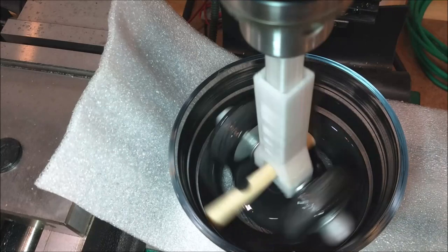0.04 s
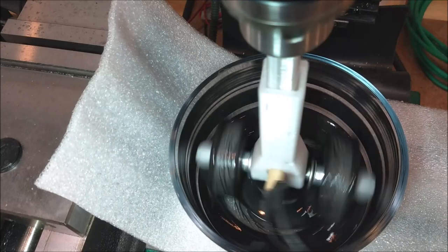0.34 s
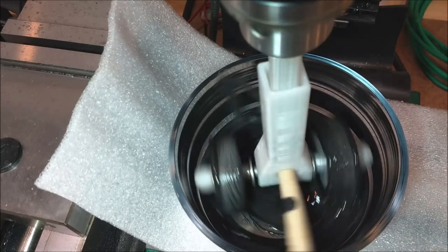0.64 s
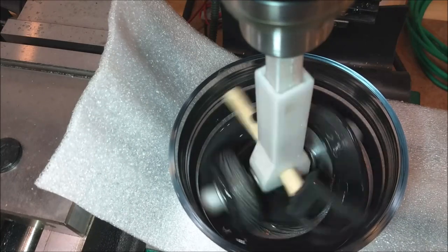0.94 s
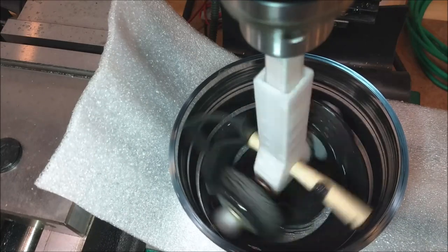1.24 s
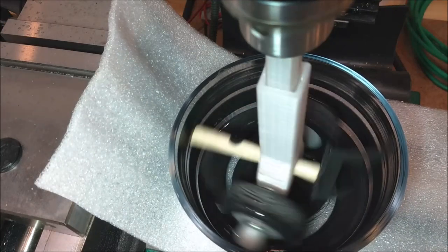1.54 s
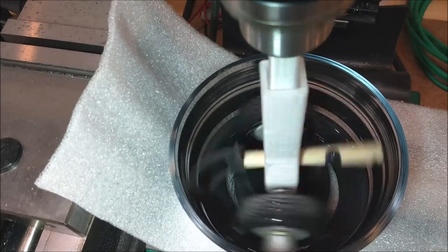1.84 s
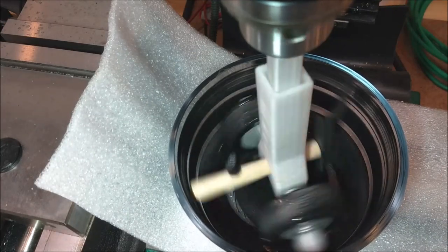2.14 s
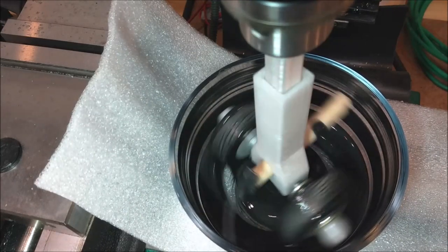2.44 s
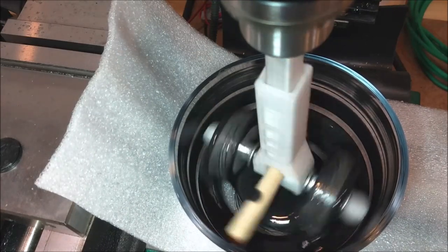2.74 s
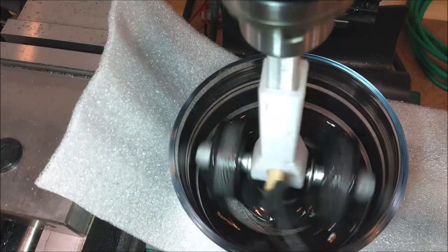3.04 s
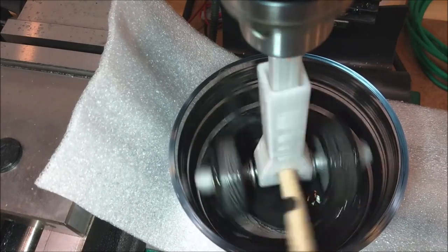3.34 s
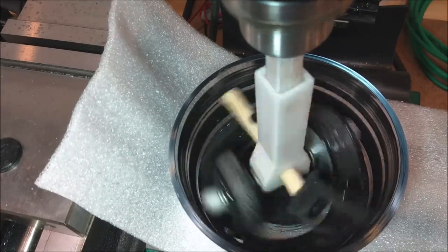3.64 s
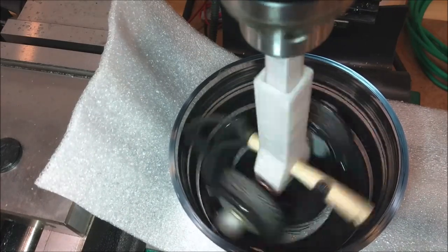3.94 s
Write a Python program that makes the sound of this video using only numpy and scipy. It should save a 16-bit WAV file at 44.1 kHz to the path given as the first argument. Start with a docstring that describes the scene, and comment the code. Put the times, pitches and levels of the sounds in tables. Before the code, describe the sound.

A mill motor hums and whirs steadily close by, turning rollers around a steel bowl. Gritty grinding swells with each turn, while dull knocks, small cracks and brief squeals come and go.

```python
"""Roller mill in a workshop

A motor hums and whirs steadily as it turns two rollers round a steel bowl; its drive throbs, moans
and knocks. The rollers grind harder at the same places on every turn, and friction excites the
bowl's resonant modes. Now and then a roller skids or squeals, or a grain cracks and rings the bowl.
Two close microphone ports hear the mill; the bowl's sound has opposite polarity in the right one."""
import sys
import numpy as np
from scipy import signal
from scipy.fft import rfft, irfft, next_fast_len
from scipy.io import wavfile
from scipy.ndimage import map_coordinates

SR = 44100
rng = np.random.default_rng(int(sys.argv[2]) if len(sys.argv) > 2 else 0)


def master_out(mix):
    """Clip the mix to full scale and print it as 16-bit PCM to the path in sys.argv[1]."""
    frames = np.transpose(np.atleast_2d(mix))
    ceiling = np.clip(frames, -1, 1)
    pcm = np.round(ceiling * 32767).astype(np.int16)
    wavfile.write(sys.argv[1], SR, pcm)


N = 176400

HUM_HZ, TURN_S = 120.02, .678
# bowl resonances (frequency [Hz], bandwidth [Hz], level [dB])
LOW_MODE, MAIN_MODE, HIGH_MODE = (2490, 92, -60.5), (3460, 72, -63), (4205, 84, -59)
# motor's phase at the left port over the right (frequency [Hz], lead [rad])
PHASE_LEAD = [(80, -3), (120, -1.8), (245, -1.8), (330, -.6), (360, -.2), (480, -.4), (660, -.2),
              (820, -.4), (1100, -.05), (1300, -.8), (1560, .3), (1750, -2.2), (2100, -3.1)]
# places of harder grinding (time in the turn [s], half width [s], rise [dB])
PRESSURE_SWELLS = [(0.26, 0.058, 6.5), (0.53, 0.016, 7), (0.15, 0.099, 3)]
# spectrum of a snapping grain (frequency [Hz], relative level [dB])
SNAP_SPECTRUM = [(1500, -12), (3000, 8), (6000, 5), (8000, -9), (10500, 7), (14500, 5), (16000, -11)]


def amp(db):
    """Decibels as an amplitude ratio."""
    return 10 ** (np.asarray(db) / 20)


def unit(x):
    """Normalisation to rms 1."""
    return x / np.sqrt(np.mean(x ** 2) + 1e-20)


def along(points, hz):
    """Interpolation of (frequency, value) points on a logarithmic axis."""
    freqs, values = np.transpose(points)
    return np.interp(np.log(hz + 1), np.log(freqs + 1), values)


def clock():
    """Sample times in seconds."""
    return np.arange(N) / SR


def bump(offset, half_width):
    """Gaussian envelope, down to 1/e at the half width."""
    return np.exp(-(offset / half_width) ** 2)


def wobble(rate):
    """Smooth random modulation: a spline through `rate` values a second."""
    return map_coordinates(rng.standard_normal(int(N * rate / SR) + 4), [clock() * rate])


def filtered(x, response):
    """Linear filtering: the spectrum times a frequency response."""
    size = next_fast_len(N + SR // 2)
    return irfft(rfft(x, size) * response(np.fft.rfftfreq(size, 1 / SR)), size)[..., :N]


def colour(x, spectrum):
    """Spectral shaping, normalised to rms 1."""
    return unit(filtered(x, lambda hz: amp(along(spectrum, hz))))


def ring(x, mode):
    """Forced resonance: two equal band-passes in cascade, scaled to the mode's level."""
    centre, width, db = mode
    band_pass = lambda hz: 1j * hz * width / (centre ** 2 - hz ** 2 + 1j * hz * width)
    return amp(db) * unit(filtered(x, lambda hz: band_pass(hz) ** 2))


def noise():
    """Two uncorrelated white noises."""
    return rng.standard_normal((2, N))


def grains(rate, spread_db):
    """Random amplitude modulation breaks noise into short bursts."""
    return unit(noise() * amp(spread_db * wobble(rate)))


def each_turn(swells):
    """Periodic gain that rises at the same places on every turn."""
    offset = lambda s: (clock() - s + TURN_S / 2) % TURN_S - TURN_S / 2
    return amp(sum(db * bump(offset(s), width) for s, width, db in swells))


def blows(events, attack, t60):
    """Impact envelope: impulses (time [s], level [dB]) convolved with a fast rise and a decay."""
    s, db = np.transpose(events)
    impulses = np.bincount(np.clip(np.round(s * SR).astype(int), 0, N - 1), amp(db), N)
    age = np.arange(SR // 4) / SR
    return signal.fftconvolve(impulses, amp(-60 * age / t60) * (1 - np.exp(-age / attack)))[:N]


def from_motor(pair):
    """Partial coherence: motor noise is partly alike at the two ports, and shifted in phase."""
    # likeness of the ports (frequency [Hz], coherence [0-1])
    coherence = [(40, .3), (80, 0.9), (170, 0.43), (300, 0.82), (370, 0.42), (550, 0.44), (700, 0.88),
                 (850, 0.84), (1100, 0.84), (1300, 0.1), (1700, 0.85), (2100, 0.91)]
    angle = lambda hz: np.arccos(np.clip(along(coherence, hz), 0, 1)) / 2
    mid, side = filtered(pair, lambda hz: np.array([np.cos(angle(hz)), np.sin(angle(hz))]))
    phase_shift = lambda hz: np.exp(.5j * np.outer([1, -1], along(PHASE_LEAD, hz)))
    return filtered(np.array([mid + side, mid - side]), phase_shift)


def from_bowl(pair):
    """Path difference: sounds from opposite sides reach the ports with opposite delays."""
    # sound from the far side (frequency [Hz], share of power [0-1])
    far_share = [(2000, .85), (7500, .25), (9500, .1), (11000, .75), (15000, .85)]
    # port balance (frequency [Hz], left minus right [dB])
    balance = [(2000, 1.5), (4000, -1.5), (8000, -1.5), (12000, -3.5)]
    port_lag_s, polarity = .000454, [[1], [-1]]
    share = lambda hz: np.clip(along(far_share, hz), 0, 1)
    lag = lambda hz: np.exp(1j * np.pi * port_lag_s * np.outer([-1, 1], hz))
    near = filtered(pair[0], lambda hz: np.sqrt(1 - share(hz)) * lag(hz))
    far = filtered(pair[1], lambda hz: np.sqrt(share(hz)) / lag(hz))
    return filtered(near + far, lambda hz: amp(np.outer([.5, -.5], along(balance, hz))) * polarity)


def tone(hz, db, pan_db, waver_db, drift_rad):
    """A sinusoid at both ports, with slight random amplitude and phase modulation."""
    phase = 2 * np.pi * (hz * clock() + rng.random()) + drift_rad * wobble(5.7)
    sides = np.array([[.5], [-.5]])
    gain = amp(db + waver_db * wobble(14)) * unit(amp(sides * pan_db))
    return gain * np.sin(phase + sides * along(PHASE_LEAD, hz))


def motor():
    """Magnetic forces hum in a harmonic series; shaft and bearings add tones of their own."""
    # magnetic hum (multiple of HUM_HZ, level [dB], left minus right [dB])
    harmonics = [(1, -59, -18), (2, -30, 14.5), (3, -47.5, 7.5), (4, -53.5, 0), (5, -58.5, 0),
                 (6, -50.5, 5), (7, -52.5, -4), (8, -54.5, 4), (9, -56.5, -5), (10, -57, -12),
                 (11, -55.5, -42), (12, -71, 4), (13, -53.5, 16), (14, -55, -22), (16, -69.5, -25),
                 (17, -67, 8)]
    # shaft and bearings (frequency [Hz], level [dB], left minus right [dB])
    shaft_tones = [(75.2, -56, 2), (406.4, -57.5, -10), (654.5, -48.5, -3), (1304.7, -52.5, -7),
                   (1710, -69, 11)]
    hum = sum(tone(k * HUM_HZ, db, pan, waver_db=.25, drift_rad=.02) for k, db, pan in harmonics[:2])
    upper = sum(tone(k * HUM_HZ, db, pan, waver_db=1, drift_rad=.32) for k, db, pan in harmonics[2:])
    whine = sum(tone(hz, db, pan, waver_db=2, drift_rad=.15) for hz, db, pan in shaft_tones)
    return hum + upper + whine


def whirr():
    """Broadband drive noise buzzes through amplitude modulation at the hum frequency."""
    # whirr (frequency [Hz], relative level [dB])
    spectrum = [(30, -20.5), (60, -15.5), (125, -3.5), (160, -9.5), (230, 1), (290, -6), (400, -5),
                (520, -4.5), (680, 0), (850, -2.5), (930, -7), (1080, -1.5), (1270, -9), (1420, -9.5),
                (1560, -7.5), (1750, -10.5), (2100, -10), (3000, -55), (6000, -50)]
    buzz = 1 + .14 * np.cos(2 * np.pi * HUM_HZ * clock())
    return amp(-43.5) * colour(grains(rate=110, spread_db=2) * buzz, spectrum)


def throb():
    """A low resonance of the drive, excited by noise, with brief surges at its own frequency."""
    # surges (time [s], level [dB])
    surges = [(.192, -45), (.581, -41), (2.365, -45), (2.487, -45), (3.067, -35)]
    hz, bandwidth_hz, steady_db, half_width_s = 345, 30, -53, .013
    carrier = lambda: np.sin(2 * np.pi * (hz * clock() + rng.random()))
    surging = sum(amp(db) * bump(clock() - s, half_width_s) * carrier() for s, db in surges)
    return surging + from_motor(ring(noise(), (hz, bandwidth_hz, steady_db)))


def moans():
    """The drive moans under load: rising chirps, roughened by random phase and amplitude."""
    # moans, about two a turn (time [s], level [dB])
    load_peaks = [(.275, -46), (.966, -43), (1.313, -45.5), (1.645, -41), (1.99, -47), (2.316, -41.5),
                  (2.93, -47), (3.332, -46.5), (3.669, -46)]
    centre_hz, rise_hz_per_s, half_width_s = 1115, 350, .035
    jitter = 1.1 * wobble(90)
    out = np.zeros(N)
    for s, db in load_peaks:
        age = clock() - s
        phase = 2 * np.pi * age * (centre_hz + rise_hz_per_s * age / 2)
        out += amp(db) * bump(age, half_width_s) * np.sin(phase + jitter)
    return np.sqrt(2) * out * amp(1.4 * wobble(120))


def knocks():
    """Impacts in the drive: each is a dull thud and a damped free vibration of the housing."""
    # knocks (time [s], level [dB], pitch [Hz])
    impacts = [(.165, -41.5, 700), (.881, -39, 680), (.951, -44, 1050), (1.337, -37.5, 695),
               (1.404, -39, 744), (1.493, -40, 1030), (2.089, -37.5, 700), (2.415, -36.5, 687),
               (2.603, -33, 944), (2.903, -39, 942), (3.101, -36, 652), (3.438, -42, 690)]
    # housing modes (multiple of the pitch, relative level [dB])
    modes = [(.88, -2), (1, 7.5), (1.16, -10.5), (2.3, -12.5)]
    # thud (frequency [Hz], relative level [dB])
    spectrum = [(200, -37), (500, -3), (700, 3), (1050, -0.5), (1600, -4), (2400, -20), (6000, -45)]
    t60 = .11
    age = np.arange(SR // 8) / SR
    onset = 1 - np.exp(-age / .0029)
    housing = np.zeros((2, N))
    for s, db, hz in impacts:
        tones = sum(amp(level) * np.sin(2 * np.pi * (k * hz * age + rng.random())) for k, level in modes)
        housing[:, round(s * SR):][:, :len(age)] += amp(db - 60 * age / t60) * onset * unit(tones)
    thud = colour(noise(), spectrum) * blows([(s, db) for s, db, _ in impacts], attack=.00062, t60=t60)
    return housing + amp(-2.5) * from_motor(thud)


def rolling():
    """Rolling noise: grit swells with the rollers' pressure; a brighter fizz follows it weakly."""
    # both (frequency [Hz], relative level [dB])
    grit_spectrum = [(600, -56), (1500, -31), (2400, 11), (3000, 1.5), (3900, 1.5), (4600, 3), (5050, 0),
                     (5450, 7.5), (5750, 4), (6050, -6), (6330, 9.5), (6700, -6), (8000, -13.5), (11000, 2),
                     (16000, -14)]
    fizz_spectrum = [(3000, 2), (6500, -4), (8600, -1), (8900, 2), (9200, 3), (9850, -38), (10200, 9),
                     (10580, -18), (10830, 9), (11100, -7), (11600, 7), (12200, -5), (13200, 4), (14200, 0),
                     (15800, 3)]
    pressure = each_turn(PRESSURE_SWELLS)
    clumps = amp(1.1 * wobble(40))
    grit = amp(-53.5) * colour(grains(rate=300, spread_db=2) * clumps, grit_spectrum)
    fizz_gain = amp(-52 + 1.4 * wobble(21.96))
    fizz = fizz_gain * colour(grains(rate=510, spread_db=2.5) * clumps, fizz_spectrum)
    return grit * pressure + fizz * pressure ** .22


def singing_bowl():
    """Friction noise drives three bowl modes, each swelling at its own places in the turn."""
    # rubbing of each mode (time in the turn [s], half width [s], rise [dB])
    low_swells = [(0.256, 0.053, 12), (0.6, 0.041, 11), (0.057, 0.037, 4.4)]
    main_swells = [(.17, 0.061, 8.1), (.27, 0.029, 6.4), (.49, 0.036, 6.5)]
    high_swells = [(.11, 0.036, 6.1), (.25, 0.055, 2.5), (.45, 0.029, 3)]
    modes = [(LOW_MODE, low_swells), (MAIN_MODE, main_swells), (HIGH_MODE, high_swells)]
    return sum(ring(noise(), mode) * each_turn(swells) for mode, swells in modes)


def scrapes():
    """Sliding friction: a skidding roller rasps in swells of grainy noise."""
    # skids (time [s], half width [s], level [dB])
    skids = [(.055, .045, -50), (.243, 0.022, -50), (.78, .028, -49), (0.924, 0.036, -58),
             (1.62, 0.027, -53), (1.8, 0.046, -59), (2.28, .03, -56), (2.96, 0.036, -49),
             (3.52, 0.016, -53.5), (3.64, 0.021, -48), (3.865, .025, -52)]
    # rasp (frequency [Hz], relative level [dB])
    spectrum = [(2000, -19), (4600, -17), (5450, 17), (5850, 8), (6800, -6), (9500, -6.5), (11500, 8.5),
                (16000, -5)]
    envelope = sum(amp(db) * bump(clock() - s, width) for s, width, db in skids)
    return envelope * colour(grains(rate=360, spread_db=4), spectrum)


def crunches():
    """Crushing: lumps crumble under a roller in very short bursts of noise."""
    # crumbling lumps (time [s], level [dB])
    lumps = [(.276, -44.5), (.952, -46), (1.593, -44), (1.626, -45), (2.172, -51), (2.306, -45),
             (2.332, -53), (2.552, -54), (2.981, -55), (3.66, -46)]
    # crunch (frequency [Hz], relative level [dB])
    spectrum = [(1500, -18), (2550, 5), (4000, -7), (5600, -5.5), (16000, -10)]
    envelope = sum(amp(db) * bump(clock() - s, half_width=.0056) for s, db in lumps)
    return envelope * colour(grains(rate=440, spread_db=5.5), spectrum)


def squeals():
    """Stick-slip friction of a roller makes one bowl mode sing out roughly."""
    # squeals (time [s], half width [s], level [dB], pitch [Hz])
    slips = [(.49, .016, -47, 3470), (.586, 0.022, -47, 2500), (.83, 0.024, -44, 3490),
             (1.18, .02, -56, 3480), (1.506, .014, -46, 3450), (1.865, 0.028, -43.5, 3450),
             (2.55, 0.038, -49, 3460), (2.88, 0.04, -46.5, 3470), (3.215, 0.017, -48, 3440),
             (3.3, .026, -48, 2534), (3.862, 0.013, -39, 3510)]
    jitter = .7 * np.array([wobble(130), wobble(130)])
    carrier = lambda hz: np.sin(2 * np.pi * hz * clock() + jitter)
    singing = sum(amp(db) * bump(clock() - s, width) * carrier(hz) for s, width, db, hz in slips)
    return singing * amp(2 * wobble(150))


def cracks():
    """Brittle fracture: a coarse grain snaps, crunches and sets the bowl's main mode ringing."""
    # cracking grains (time [s], noise level [dB], ring level [dB])
    fractures = [(0.025, -49, -60), (0.27, -43, -42), (.484, -43.5, -46), (0.762, -47, -66),
                 (.872, -38, -33), (.949, -45, -57), (1.195, -40.5, -37.5), (1.383, -45, -60),
                 (1.589, -37, -38), (1.599, -51, -52), (1.868, -46, -46), (2.166, -50, -58),
                 (2.328, -41, -55), (2.549, -35.5, -36), (2.943, -39, -63), (3.652, -41, -55),
                 (3.67, -44, -60), (3.684, -39.5, -51), (3.887, -46, -38), (3.925, -44, -37)]
    # crunch after the snap (frequency [Hz], relative level [dB])
    spectrum = [(1000, -21), (2500, -13), (3100, -3), (3460, 23.5), (3900, 24), (4700, -12), (5500, 25.5),
                (6700, 16), (9000, -8), (10300, 28.5), (14500, -13), (16000, -9)]
    bursts = [(s, db) for s, db, _ in fractures]
    pings = [(s, db) for s, _, db in fractures]
    snap = amp(2.5) * colour(noise(), SNAP_SPECTRUM) * blows(bursts, attack=.00039, t60=.016)
    crunch = colour(noise(), spectrum) * blows(bursts, attack=.0008, t60=.045)
    jitter = 1.36 * np.array([wobble(90), wobble(90)])
    bowl_tone = np.sin(2 * np.pi * MAIN_MODE[0] * clock() + jitter)
    return snap + crunch + bowl_tone * blows(pings, attack=.00054, t60=.075)


def ticks():
    """Shot noise: fine grains break at random times, louder under pressure."""
    per_second, base_db, spread_db = 48, -56.5, 5.5
    draws = rng.random((int(per_second * N / SR), 2))
    # many faint ticks, few loud ones
    events = [(when * N / SR, base_db - spread_db * np.log(rank + .044)) for when, rank in draws]
    envelope = blows(events, attack=.0002, t60=.016) * each_turn(PRESSURE_SWELLS) ** .5
    return colour(noise(), SNAP_SPECTRUM) * envelope


def scene():
    """Superposition of motor, drive and grinding at the two ports."""
    machine = motor() + from_motor(whirr()) + throb() + moans() + knocks()
    grinding = rolling() + singing_bowl() + scrapes() + crunches() + squeals() + cracks() + ticks()
    return machine + from_bowl(grinding)


def record(dry):
    """Band limiting: an ideal low-pass removes the highest treble."""
    return filtered(dry, lambda hz: hz < 15800)


dry = scene()
out = record(dry)
master_out(out)
```